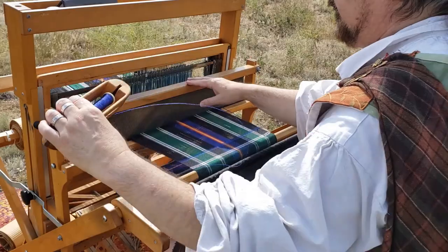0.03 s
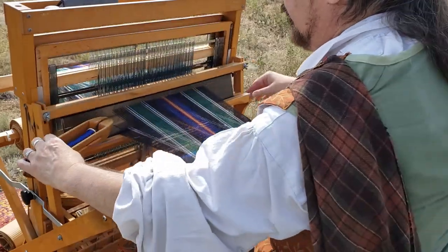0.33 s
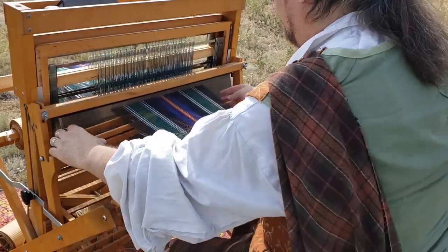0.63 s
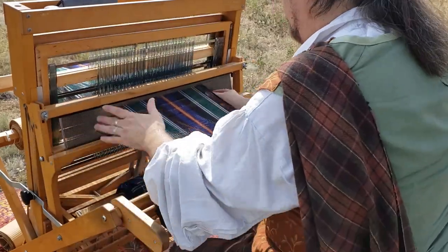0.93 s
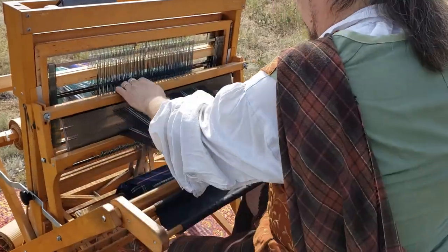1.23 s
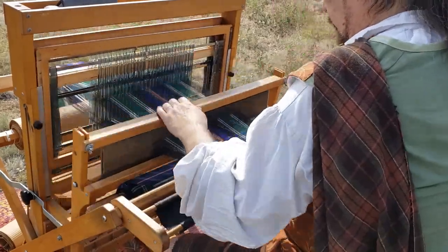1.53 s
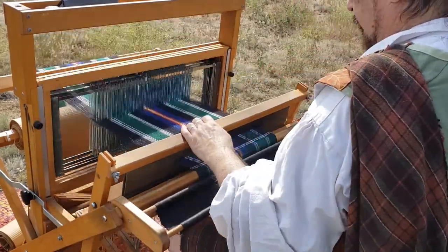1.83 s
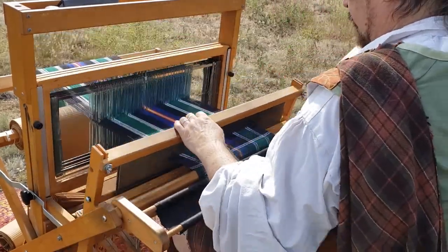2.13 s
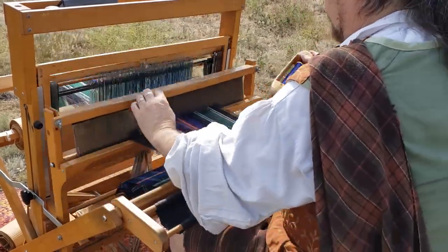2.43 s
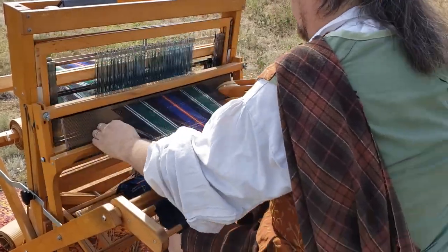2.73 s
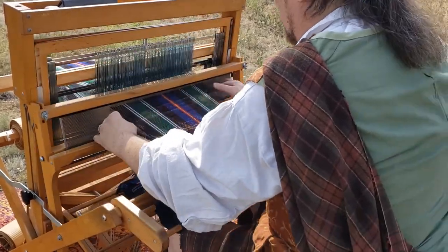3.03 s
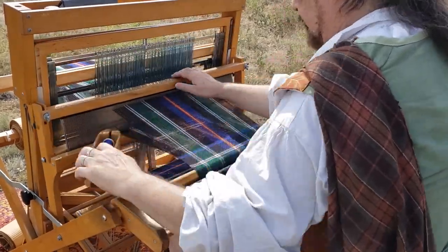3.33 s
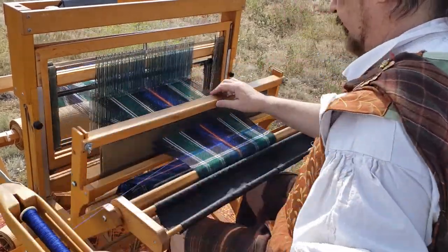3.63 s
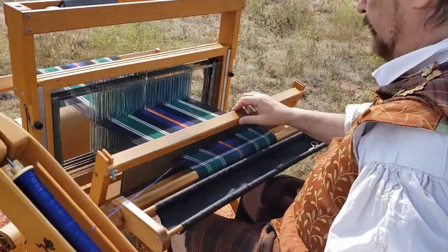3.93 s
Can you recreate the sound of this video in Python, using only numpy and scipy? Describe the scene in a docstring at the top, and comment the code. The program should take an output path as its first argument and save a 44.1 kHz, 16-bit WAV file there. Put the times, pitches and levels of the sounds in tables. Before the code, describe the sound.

Close to a hand loom in the open air, wood clacks and wire heddles rattle, followed by light shuttle scrapes and the beater's thud. This happens twice, while a far motor hums faintly beneath soft outdoor air.

```python
"""Wooden hand loom outdoors

Close by, treadles drop the shaft frames with wooden clacks and their wire heddles rattle. The shuttle
slides through the warp; the beater scrapes to and fro and thumps the cloth. Blows and grainy friction
drive the resonances of each part. A far motor hums under light open air."""
import sys
import numpy as np
from scipy import signal
from scipy.fft import rfft, irfft, next_fast_len
from scipy.io import wavfile
from scipy.ndimage import map_coordinates

SR = 44100
rng = np.random.default_rng(int(sys.argv[2]) if len(sys.argv) > 2 else 0)


def persist_wave(psi):
    """Save psi, clipped to +-1, as 16-bit WAV."""
    counts = np.round(np.clip(psi, -1, 1) * 32767).astype(np.int16)
    wavfile.write(sys.argv[1], SR, np.atleast_2d(counts).T)


N = 176400
EVENT_SAMPLES = 32768
GRAZE_S = 0.009  # parts graze this long before they strike

# heddle tick spectrum: f/Hz, level/dB
TICK_COLOUR = [(200, -28), (1000, -8), (2500, -6), (4000, -1.5), (6300, -3.5), (8800, -19), (12000, -13.5),
               (16000, -22)]


def shafts():
    """Shaft frames drop onto wood and bounce."""
    # t/s, level/dB, tilt/(dB/oct)
    clacks = [(0.2264, -22, 1.5), (0.2357, -23, 4), (0.2414, -21, -6.5), (0.2488, -15.5, 2),
              (0.2571, -23.5, 2), (0.269, -31.5, 7.5), (0.326, -29.5, 1.5), (1.742, -33, 0),
              (1.76, -30.5, 2), (1.768, -28.5, -5), (1.807, -33.5, -7), (2.548, -32, -5),
              (2.5509, -19, 2.5), (2.556, -31, -7.5), (2.5595, -18, 4.5), (2.566, -12.5, -1.5),
              (2.65, -22, -1.5), (2.693, -39.5, 5.5), (3.84, -24, -2)]
    # f/Hz, level/dB
    colour = [(100, -8.5), (300, -22.5), (800, -6.5), (1400, -6.5), (2400, -2), (4000, 2), (6000, -1.5),
              (8800, -19), (11500, -13.5), (16000, -20.5)]
    # f/Hz, width/Hz, lift/dB
    modes = [(580, 30, 3.2), (1357, 40, 15), (1890, 160, 17), (2320, 65, 12), (2526, 250, 13),
             (3360, 60, 4.4)]
    return strikes(clacks, body(colour, modes), t60_s=0.0069, tail_db=-5, tail_t60_s=0.089, snap_db=17)


def heddles():
    """Wire heddles and reed rattle at each drop and beat, with light ticks between."""
    # peak t/s, level/dB, t60/s, tilt/(dB/oct)
    rattles = [(.245, -33, 0.79, -1), (1.775, -30, 0.63, 0.4), (1.853, -29.5, 0.14, 1),
               (1.866, -18.5, 0.24, 4), (2.415, -36, 0.26, -1), (2.566, -29.5, 0.36, -0.5),
               (2.655, -43, 0.73, -1), (3.85, -35.5, 0.99, 0), (3.917, -22.5, 0.25, 2),
               (3.932, -21, 0.13, 3)]
    # t/s, level/dB
    ticks = [(.160, -40.5), (0.383, -32), (0.4217, -38), (.480, -37.5), (.551, -37.5), (.586, -40),
             (.863, -44.5), (1.031, -36.5), (1.169, -47.5), (1.627, -46), (2.065, -39), (2.7649, -33.5),
             (2.935, -39), (3.09, -36), (3.109, -38), (3.503, -46), (3.58, -38), (3.77, -36)]
    # f/Hz, level/dB
    rattle_colour = [(100, -23), (300, -4), (800, -3), (2000, -2.5), (4000, -1), (6000, -2.5), (7600, -5.5),
                     (8700, -16), (11300, -8.5), (13500, -18), (16000, -19.5)]
    # f/Hz, width/Hz, lift/dB
    modes = [(4690, 150, 4), (5410, 180, 4.1), (6070, 150, 7.7)]
    rattling = chatter(rattles, body(rattle_colour, modes), rise_s=0.024, grain_db=3, clump_db=2.6)
    wire = body(TICK_COLOUR, modes)
    return rattling + strikes(ticks, wire, t60_s=0.046, tail_db=-15, tail_t60_s=0.14, snap_db=9.5)


def shuttle():
    """The hollow shuttle slides and jostles on its race."""
    # peak t/s, level/dB, t60/s
    slides = [(.03, -46.5, 0.59), (.17, -50, 0.85), (.555, -44, 0.12), (.878, -43, 0.35), (.995, -48, 0.59),
              (1.04, -41.5, 0.11), (1.185, -42, 0.16), (2.9, -42.5, 0.22), (2.96, -44, 0.44),
              (3.012, -38.5, 0.091), (3.117, -38, 0.24)]
    # f/Hz, level/dB
    colour = [(150, -9.5), (500, -2), (1300, -4.5), (3500, 0), (5500, -6), (7200, -5.5), (9000, -19),
              (16000, -15.5)]
    # f/Hz, width/Hz, lift/dB
    modes = [(2254, 42, 9), (5870, 74, 6.3)]
    return chatter(slides, body(colour, modes), rise_s=0.061, grain_db=3.5, clump_db=3.5)


def wood_notes(attack_s=0.0024, t60_s=0.15, waver_rad=0.26):
    """Single modes of the shuttle and wooden bars ring briefly, wavering as they die."""
    # t/s, level/dB, f/Hz
    notes = [(.714, -48.5, 718), (.882, -46.5, 724), (.908, -48.5, 1890), (.952, -48, 1850),
             (1.03, -41.5, 2340), (1.166, -47, 500), (1.685, -54, 1010), (1.865, -40, 315),
             (2.948, -41, 2265), (3.104, -44, 513), (3.178, -44, 510), (3.94, -26, 2310)]
    out, t = np.zeros((2, N)), np.arange(EVENT_SAMPLES) / SR
    for start_s, db, hz in notes:
        phase = 2 * np.pi * (hz * t + rng.random()) + waver_rad * wobble(160, EVENT_SAMPLES)
        envelope = amp(db - 60 * t / t60_s) * (1 - np.exp(-t / attack_s))
        note = envelope * np.sin(phase)
        add(out, start_s, np.array([note, note]))
    return out


def beater_swing(creak_t60_s=0.076, creak_width_hz=300, creak_lift_db=16):
    """The swinging beater rubs, and creaks by stick-slip."""
    # peak t/s, level/dB, t60/s, tilt/(dB/oct)
    rubs = [(1.505, -48, 0.31, 2), (1.56, -43, 0.2, 2), (1.645, -49.5, 0.98, 1), (3.55, -43, 0.77, 3),
            (3.7, -50, 1, 2)]
    # f/Hz, level/dB
    rub_colour = [(200, -5.5), (800, -5), (1600, -8.5), (4200, 1.5), (9000, -16), (16000, -21.5)]
    # f/Hz, width/Hz, lift/dB
    rub_modes = [(820, 40, 13)]
    # peak t/s, level/dB, f/Hz
    creaks = [(1.496, -37, 4330), (3.518, -38, 4400), (3.547, -34.5, 4450), (3.581, -34.5, 3850),
              (3.608, -38.5, 4440), (3.688, -34, 3700), (3.704, -40.5, 4100), (3.723, -38, 3770),
              (3.772, -33, 4120), (3.801, -33.5, 3600)]
    # f/Hz, level/dB
    creak_colour = [(2500, -10.5), (4000, -1), (5500, -1.5), (16000, -22.5)]
    out = chatter(rubs, body(rub_colour, rub_modes), rise_s=0.068, grain_db=2.5, clump_db=3)
    for peak_s, db, hz in creaks:
        wood = body(creak_colour, [(hz, creak_width_hz, creak_lift_db)])
        out += chatter([(peak_s, db, creak_t60_s)], wood, rise_s=0.011, grain_db=3.5, clump_db=1)
    return out


def warp(width_hz=500, lift_db=11):
    """Warp threads brush through the reed."""
    # peak t/s, level/dB, t60/s, f/Hz
    swishes = [(0.024, -36, 0.27, 6740), (2.186, -34, 0.12, 6410), (2.305, -35, 0.27, 5910)]
    # f/Hz, level/dB
    colour = [(1500, -20), (4500, -10.5), (7400, -10.5), (8800, -16.5), (11500, -16), (16000, -28.5)]
    out = np.zeros((2, N))
    for peak_s, db, t60_s, hz in swishes:
        threads = body(colour, [(hz, width_hz, lift_db)])
        out += chatter([(peak_s, db, t60_s)], threads, rise_s=0.14, grain_db=1, clump_db=3)
    return out


def beater_press():
    """The beater thuds into the cloth."""
    # peak t/s, level/dB, t60/s
    beats = [(1.878, -35, 0.19), (3.925, -48.5, .22)]
    # f/Hz, level/dB
    colour = [(100, -9.5), (300, -11.5), (1200, -7.5), (2500, -16.5), (16000, -56.5)]
    # f/Hz, width/Hz, lift/dB
    modes = [(312, 14, 4), (600, 80, 6.1), (1220, 96, 16)]
    return chatter(beats, body(colour, modes), rise_s=0.036, grain_db=5.5, clump_db=2)


def frame():
    """Dull knocks on the wooden frame."""
    # t/s, level/dB
    knocks = [(.541, -47.5), (1.879, -38.5), (2.933, -34), (3.178, -53.5)]
    # f/Hz, level/dB
    colour = [(80, -44), (350, -7), (800, 3.5), (1200, 1), (1600, -6.5), (4000, -9.5), (16000, -47.5)]
    # f/Hz, width/Hz, lift/dB
    modes = [(430, 61, 12.5), (797, 110, 7.9), (1170, 140, 8.4)]
    return strikes(knocks, body(colour, modes), t60_s=0.036, tail_db=-1.5, tail_t60_s=0.13, snap_db=20)


def stand():
    """Low thumps pass through the cloth and stand."""
    # t/s, level/dB
    thumps = [(0.793, -47.5), (2.075, -39.5), (2.259, -39), (2.58, -37.5), (2.634, -42), (2.944, -39.5)]
    # f/Hz, level/dB
    colour = [(15, -31.5), (40, -2), (65, 2), (200, -16.5), (2000, -76.5)]
    return strikes(thumps, body(colour), t60_s=0.19, tail_db=-7.5, tail_t60_s=0.49, snap_db=24.5)


def afterring(loom, level_db=-24.5, t60_s=0.79):
    """Every loom sound leaves the hanging heddles ringing faintly."""
    t = np.arange(EVENT_SAMPLES) / SR
    tail = resonate(noise(EVENT_SAMPLES) * amp(-60 * t / t60_s), body(TICK_COLOUR))
    tail /= np.linalg.norm(tail[0])
    return amp(level_db) * signal.fftconvolve(loom, tail, axes=1)[:, :N]


def motor(hum_hz=98.1):
    """A far motor hums, wavering in pitch and level."""
    # t/s, level/dB
    contour = [(0, -44), (0.499, -47.5), (1.9, -51.5), (2.8, -62), (3.101, -55.5), (4, -55.5)]
    # multiple of hum_hz, level/dB
    partials = [(1, -2), (1.3, -15)]
    level = amp(np.interp(np.arange(N) / SR, *np.transpose(contour)) + 1.2 * wobble(12, N))
    cycles = np.cumsum(hum_hz * (1 + 0.008 * wobble(11, N))) / SR
    hum = sum(amp(db + 0.5 * wobble(12, N)) * np.sin(2 * np.pi * (multiple * cycles + rng.random()))
              for multiple, db in partials)
    return np.sqrt(2) * level * hum


def open_air(level_db=-54):
    """Soft, low rush of open air."""
    # f/Hz, relative density/dB
    colour = [(20, -17.5), (62, 3.5), (130, -4), (200, -11), (400, -19), (800, -37), (5500, -44),
              (8500, -52.5), (16000, -39.5)]
    rush = unit(filtered(noise(N), lambda hz: amp(along(colour, hz))))
    return rush * amp(level_db + 0.66 * wobble(7.6, N))


def strikes(rows, gain, t60_s, tail_db, tail_t60_s, snap_db):
    """Blows on a body: graze, one-sample snap, quick scatter, tail. Optional third column: tilt."""
    out, t = np.zeros((2, N)), np.arange(EVENT_SAMPLES) / SR - GRAZE_S
    after_s = np.maximum(t, 0)
    graze = amp(40 * np.minimum(t, 0) / GRAZE_S)
    decay = amp(-60 * after_s / t60_s) + amp(tail_db - 60 * after_s / tail_t60_s)
    for hit_s, db, *tilt in rows:
        force = noise(EVENT_SAMPLES) * graze * decay
        force[:, round(GRAZE_S * SR)] = amp(snap_db)
        add(out, hit_s - GRAZE_S, amp(db) * resonate(force, gain, *tilt))
    return out


def chatter(rows, gain, rise_s, grain_db, clump_db, grains_per_s=1500, clumps_per_s=170):
    """Tiny clumped contacts swell 60 dB in rise_s, then die away. Optional fourth column: tilt."""
    out, t = np.zeros((2, N)), np.arange(EVENT_SAMPLES) / SR - rise_s
    for peak_s, db, t60_s, *tilt in rows:
        hiss = noise(len(t))
        rough_db = grain_db * wobble(grains_per_s, len(t)) + clump_db * wobble(clumps_per_s, len(t))
        grains = unit(hiss * amp(rough_db))
        swell = amp(db - 60 * np.maximum(t / t60_s, -t / rise_s))
        add(out, peak_s - rise_s, resonate(grains * swell, gain, *tilt))
    return out


def body(colour, modes=(), ripple_db=1.6, ripple_hz=31.84):
    """Gain spectrum: broad colour, main resonances and a random ripple of weak ones."""
    hz = np.fft.rfftfreq(EVENT_SAMPLES, 1 / SR)
    peaks = sum(amp(db) ** 2 / (1 + (2 * (hz - centre) / width) ** 2) for centre, width, db in modes)
    lift = np.sqrt(1 + peaks)
    ripple = map_coordinates(rng.standard_normal(len(hz)), [hz / ripple_hz])
    return lift * amp(along(colour, hz) + ripple_db * ripple / lift * np.minimum(hz / 400, 1))


def resonate(force, gain, tilt_db_per_oct=0):
    """Force through a body's minimum-phase response; harder contacts tilt it brighter."""
    hz = np.fft.rfftfreq(EVENT_SAMPLES, 1 / SR)
    tilted = unit(gain * amp(tilt_db_per_oct * np.log2(np.maximum(hz, 400))))
    cepstrum = irfft(np.log(tilted + 1e-6))
    cepstrum[1:EVENT_SAMPLES // 2] *= 2
    cepstrum[EVENT_SAMPLES // 2 + 1:] = 0
    return irfft(rfft(force) * np.exp(rfft(cepstrum)))


def noise(size):
    """White stereo noise, the channels most alike in the midrange."""
    # f/Hz, left-right correlation
    likeness = [(40, 0.17), (1100, 0.83), (2300, 0.15), (5000, 0.14), (12000, 0.29)]

    def mid_side_gains(hz):
        angle = np.arccos(np.clip(along(likeness, hz), -1, 1)) / 2
        return np.array([np.cos(angle), np.sin(angle)])

    mid, side = filtered(rng.standard_normal((2, size)), mid_side_gains)
    return np.array([mid + side, mid - side])


def amp(db):
    """Decibels to gain."""
    return 10 ** (np.asarray(db) / 20)


def unit(x):
    """Scale to rms 1."""
    return x / np.sqrt(np.mean(x ** 2) + 1e-20)


def along(points, hz):
    """Interpolate (f/Hz, value) points on a log axis."""
    f, values = np.transpose(points)
    return np.interp(np.log(hz + 1), np.log(f + 1), values)


def wobble(knots_per_s, size):
    """Smooth random curve."""
    knots = rng.standard_normal(int(size * knots_per_s / SR) + 4)
    return map_coordinates(knots, [np.arange(size) * knots_per_s / SR])


def filtered(x, response):
    """Apply response(hz) by FFT."""
    padded = next_fast_len(x.shape[-1] + 8192)
    hz = np.fft.rfftfreq(padded, 1 / SR)
    return irfft(rfft(x, padded) * response(hz), padded)[..., :x.shape[-1]]


def add(out, start_s, sound):
    """Mix a sound in, cropped to out."""
    start = round(start_s * SR)
    sound = sound[:, max(-start, 0):]
    part = out[:, max(start, 0):][:, :sound.shape[1]]
    part += sound[:, :part.shape[1]]


def scene():
    """The loom stands slightly left, so it reaches the right channel later; motor and air behind."""
    loom = shafts() + heddles() + shuttle() + wood_notes()
    loom += beater_swing() + warp() + beater_press() + frame() + stand()
    loom += afterring(loom)
    lag_s = np.array([[0], [0.00013]])
    return filtered(loom, lambda hz: np.exp(-2j * np.pi * hz * lag_s)) + motor() + open_air()


def record(dry):
    """The channels differ in colour and share a band limit."""
    # f/Hz, left minus right/dB
    balance = [(60, -4.5), (300, 1), (1200, 2.5), (2500, 1)]
    share, top_hz = np.array([[0.5], [-0.5]]), 15750
    return filtered(dry, lambda hz: amp(along(balance, hz) * share) * (hz < top_hz))


dry = scene()
out = record(dry)
persist_wave(out)
```